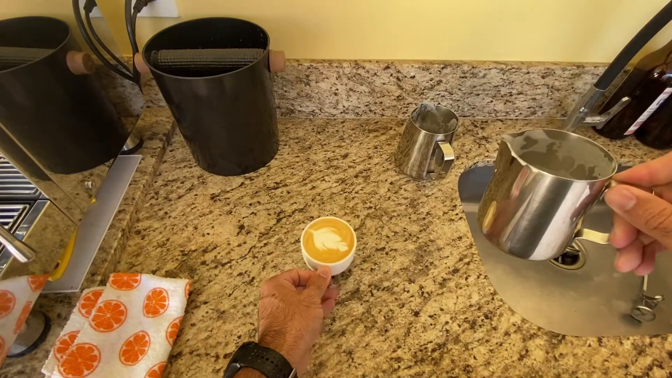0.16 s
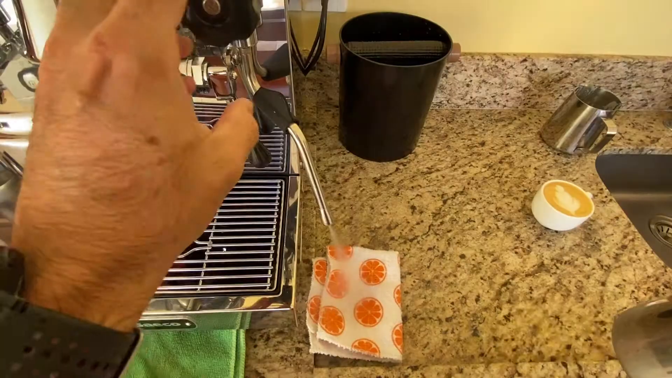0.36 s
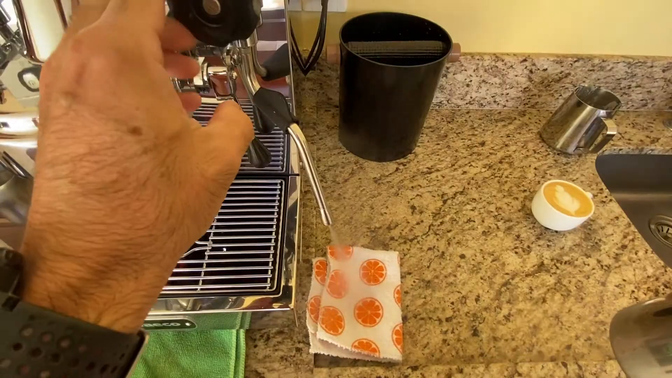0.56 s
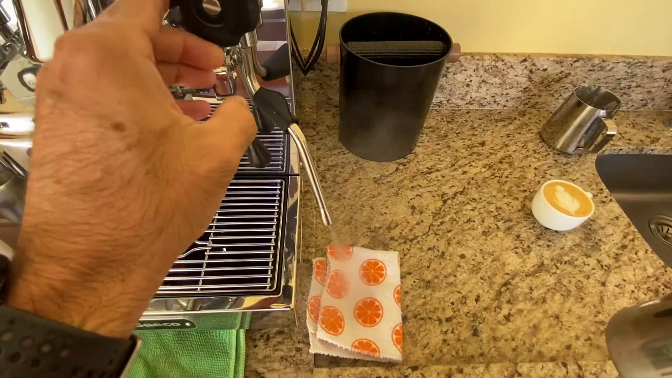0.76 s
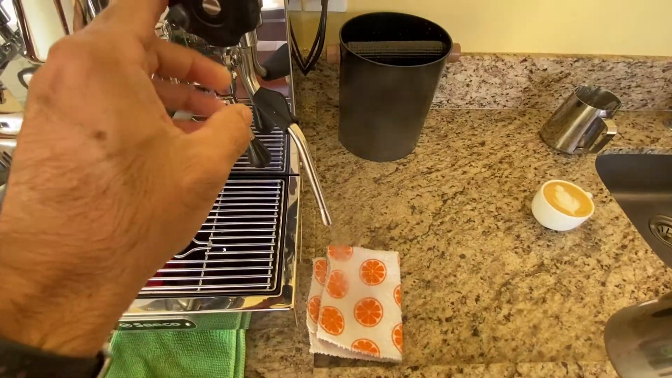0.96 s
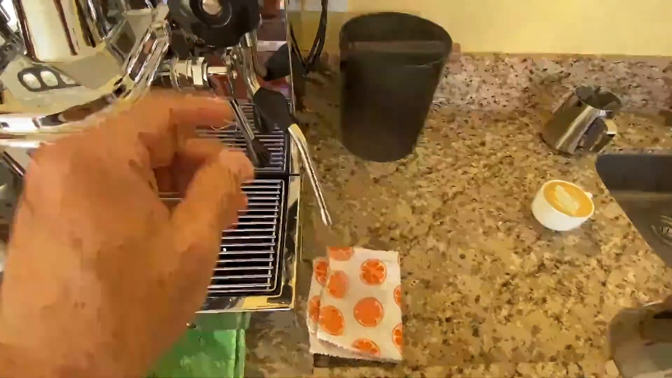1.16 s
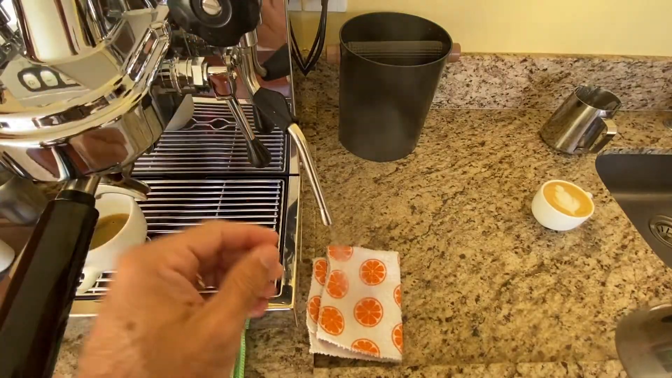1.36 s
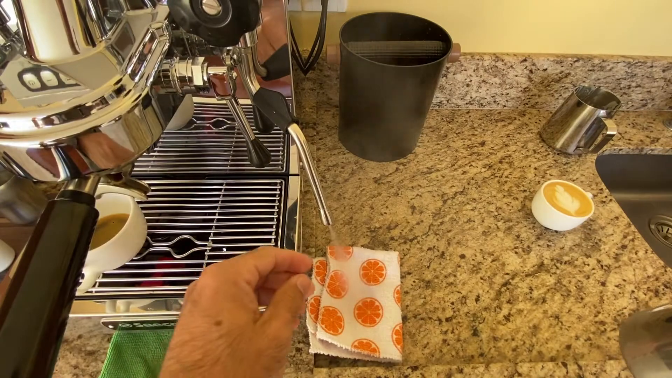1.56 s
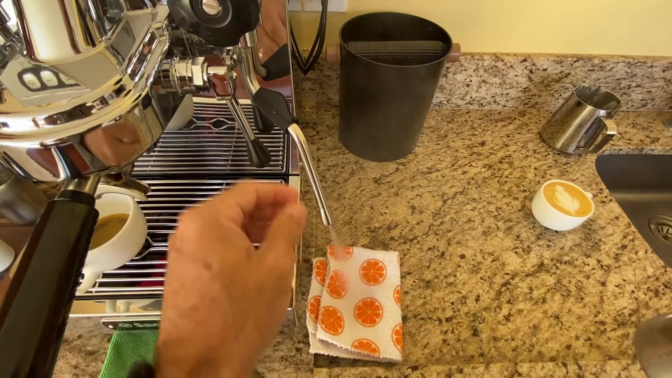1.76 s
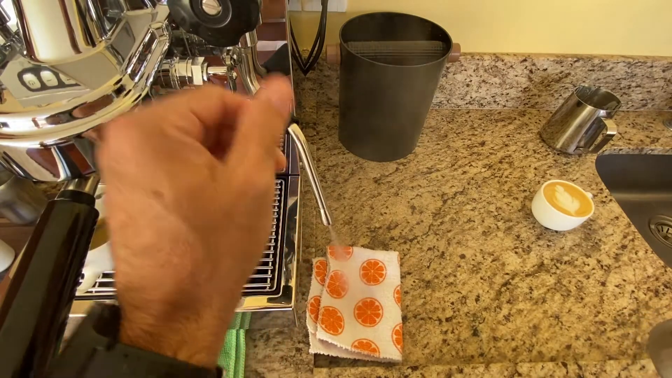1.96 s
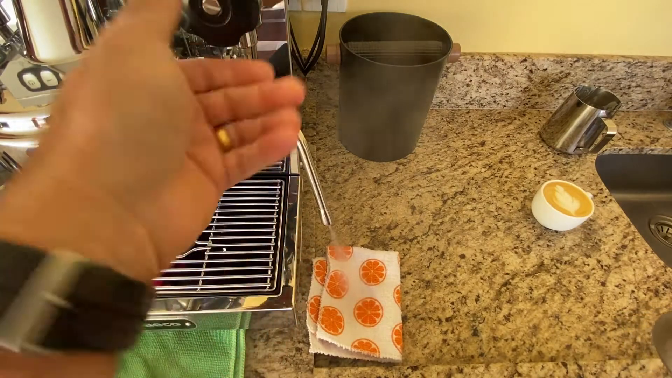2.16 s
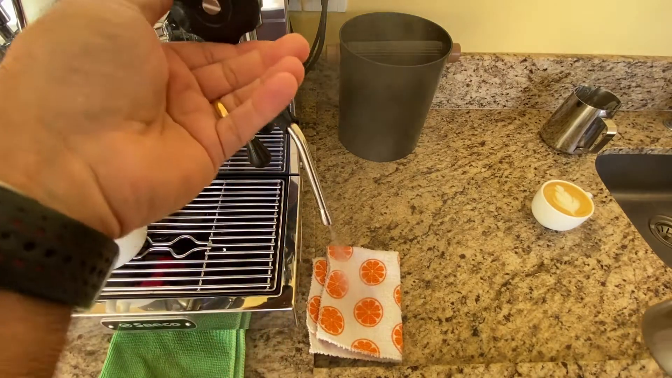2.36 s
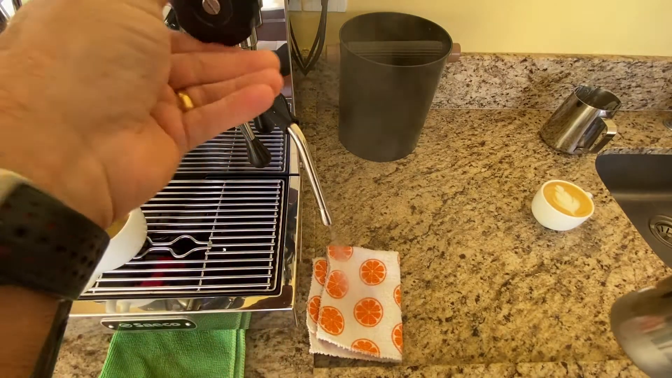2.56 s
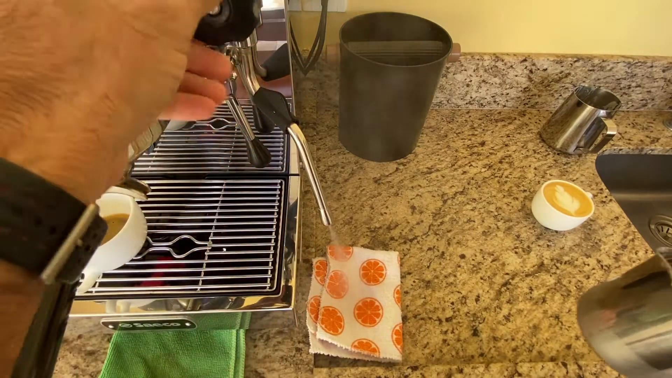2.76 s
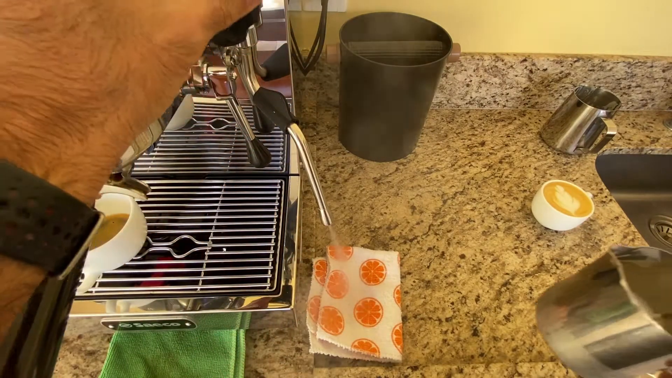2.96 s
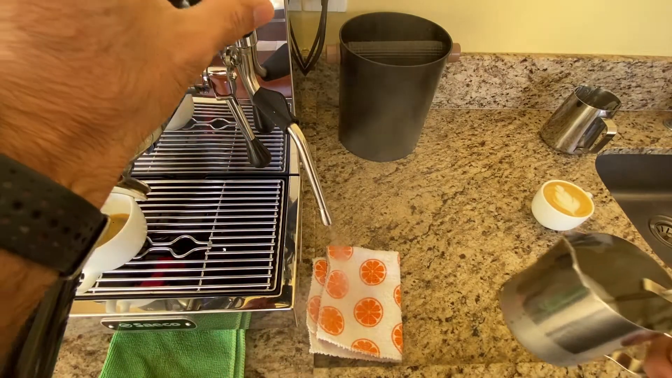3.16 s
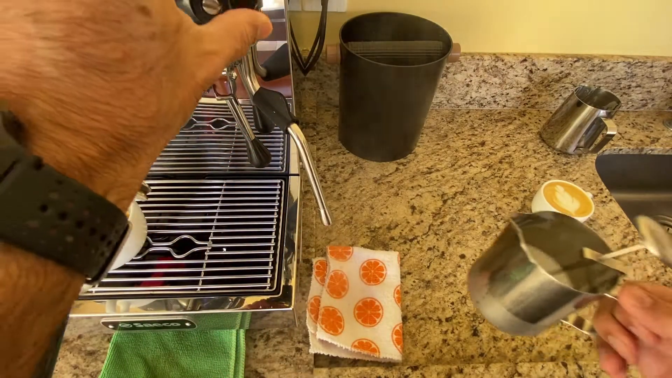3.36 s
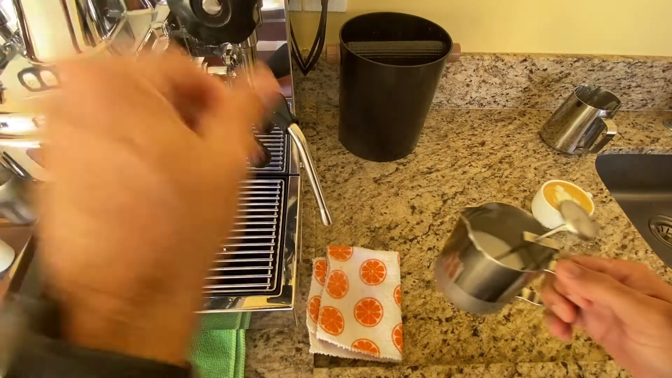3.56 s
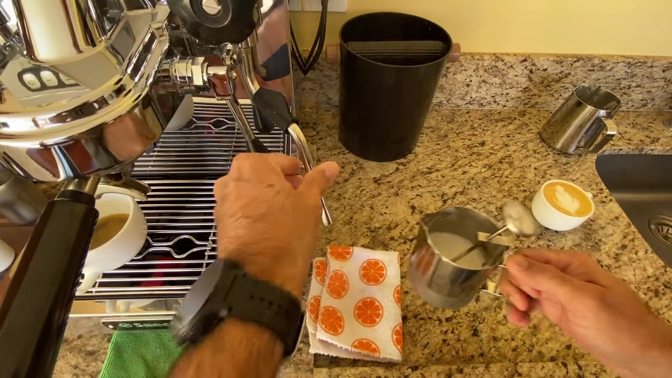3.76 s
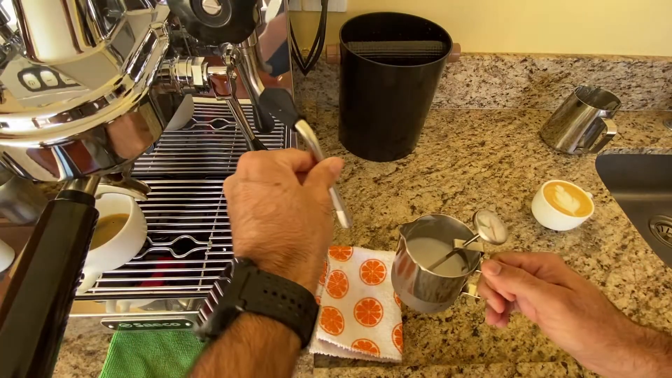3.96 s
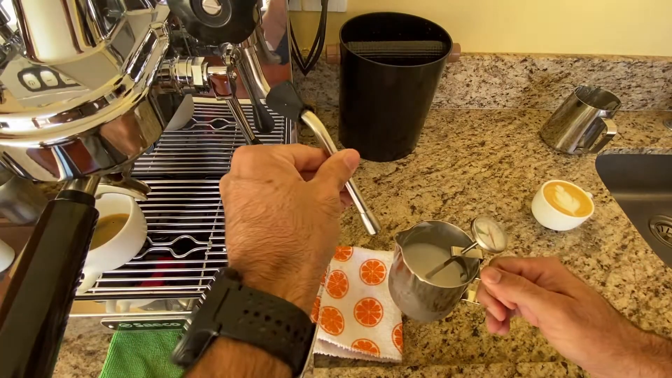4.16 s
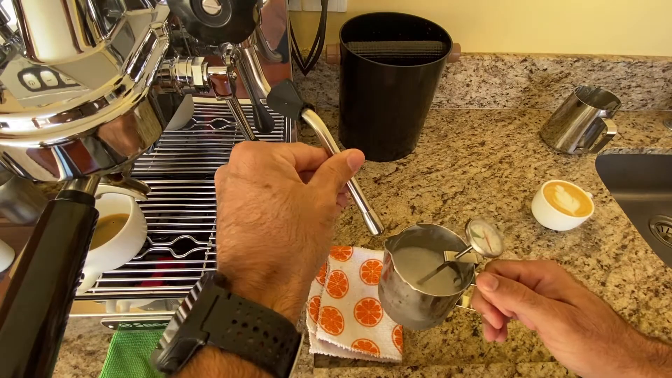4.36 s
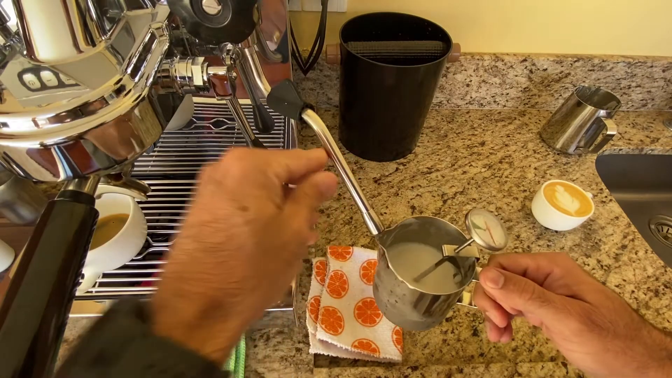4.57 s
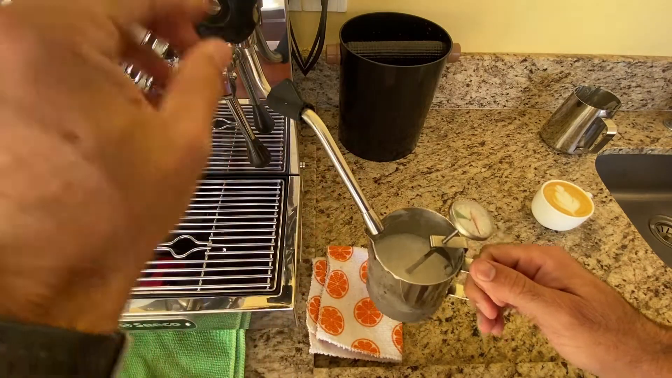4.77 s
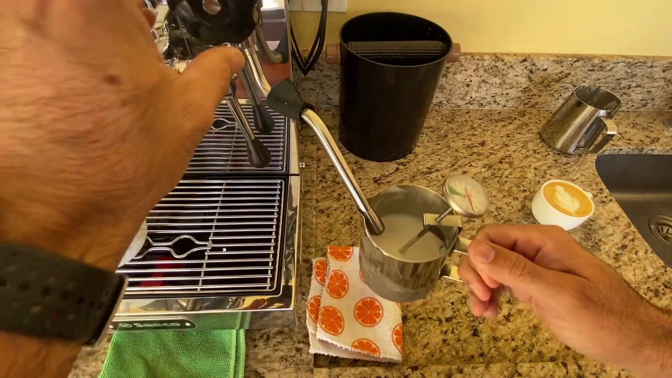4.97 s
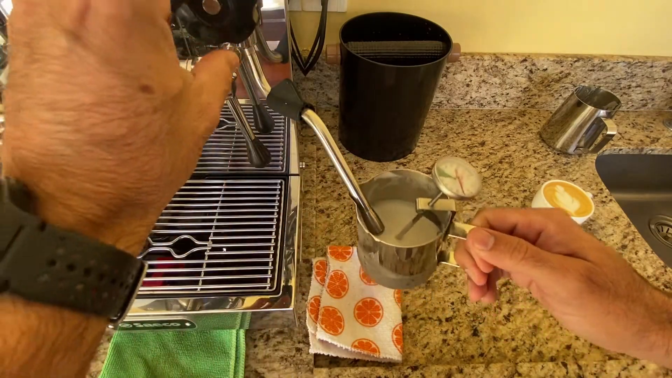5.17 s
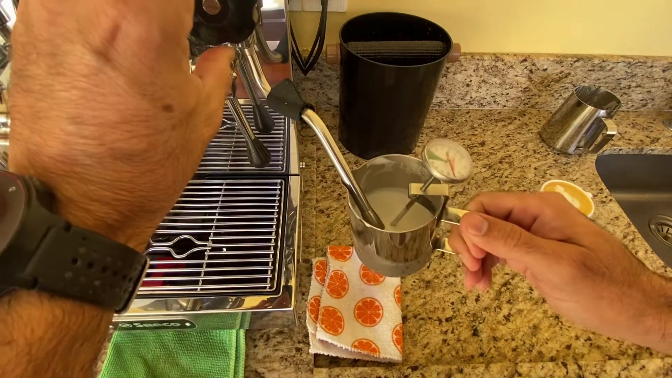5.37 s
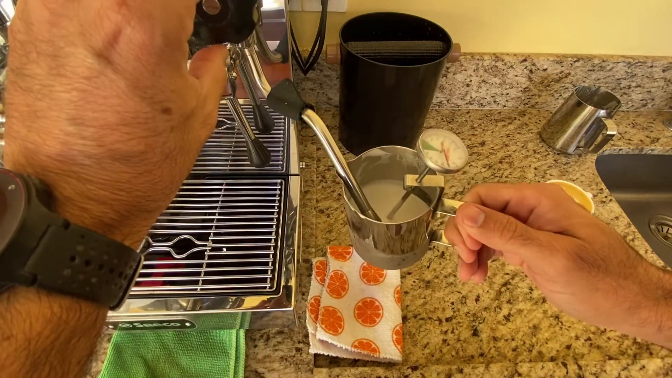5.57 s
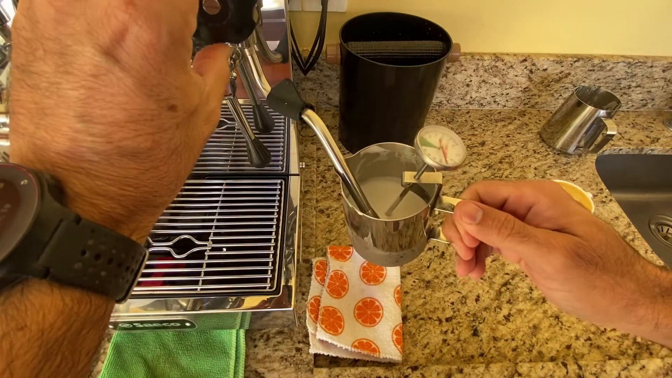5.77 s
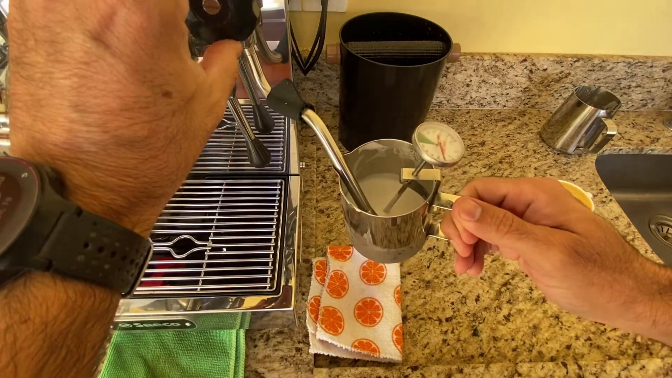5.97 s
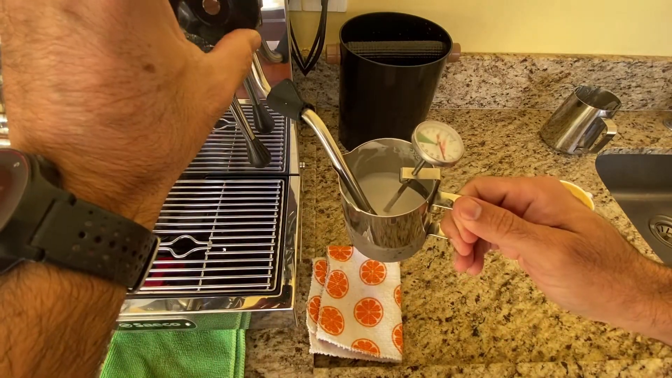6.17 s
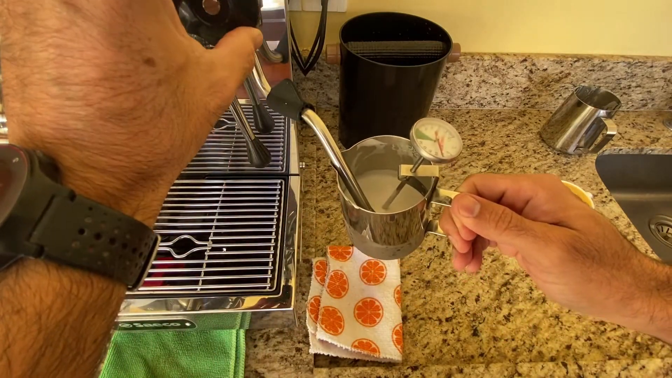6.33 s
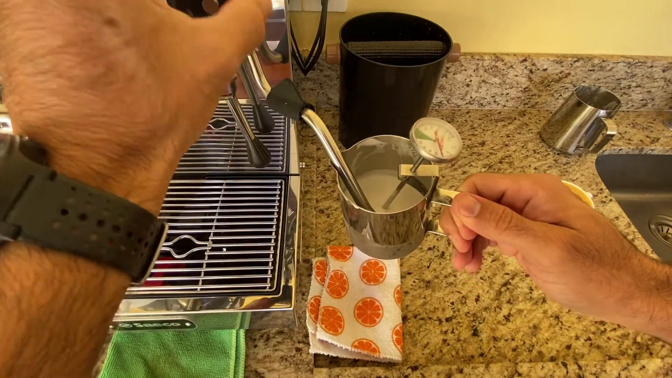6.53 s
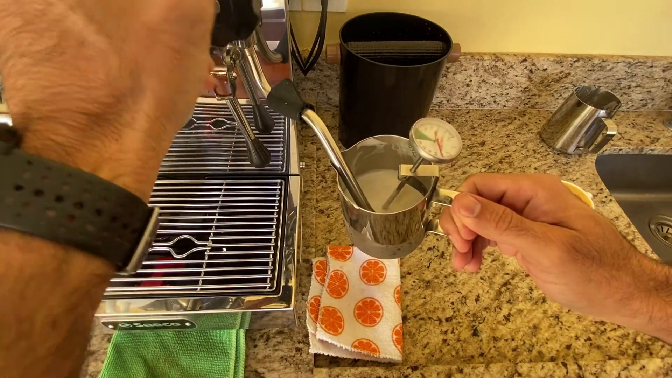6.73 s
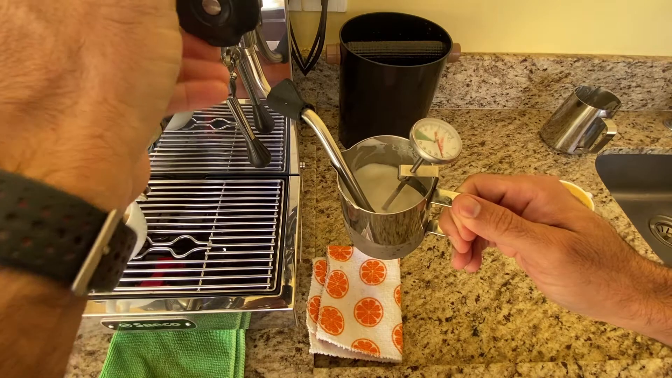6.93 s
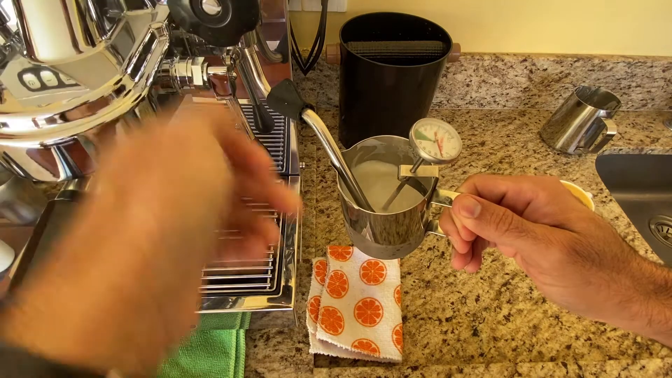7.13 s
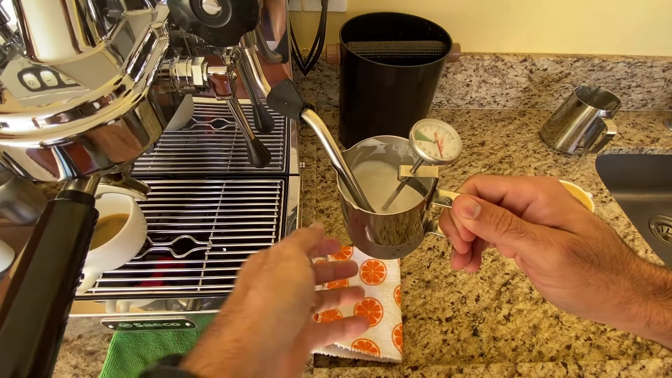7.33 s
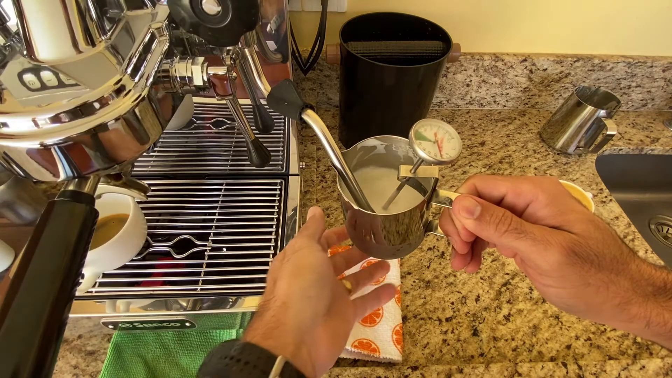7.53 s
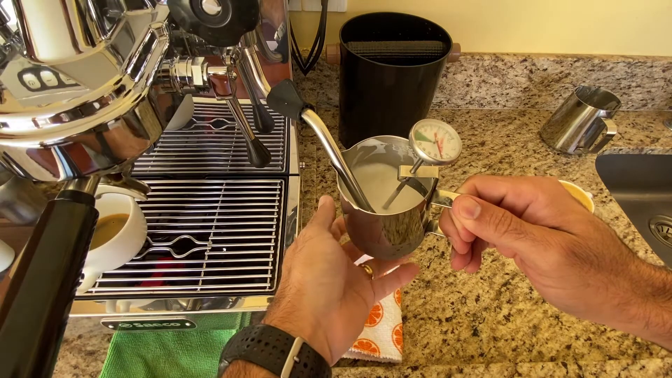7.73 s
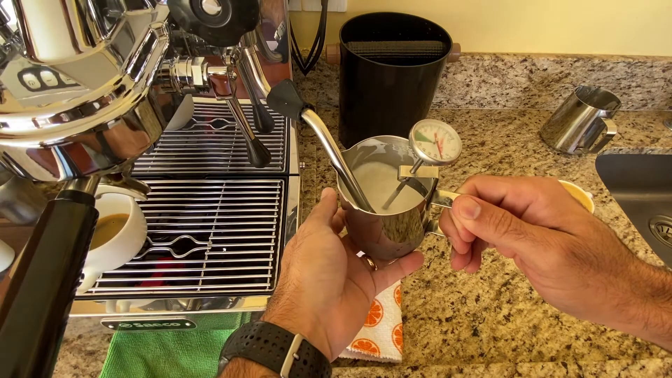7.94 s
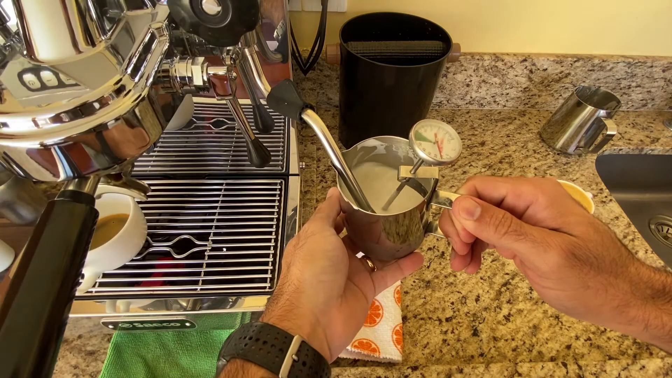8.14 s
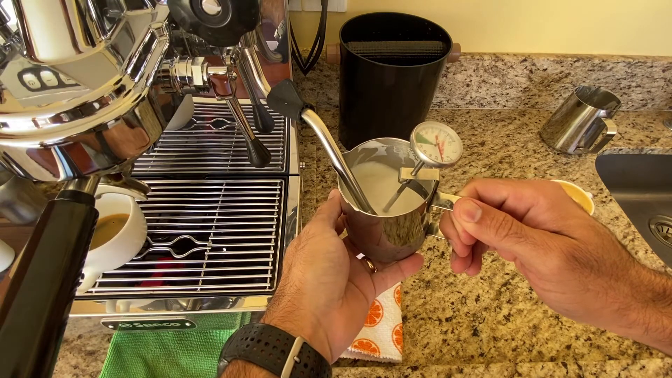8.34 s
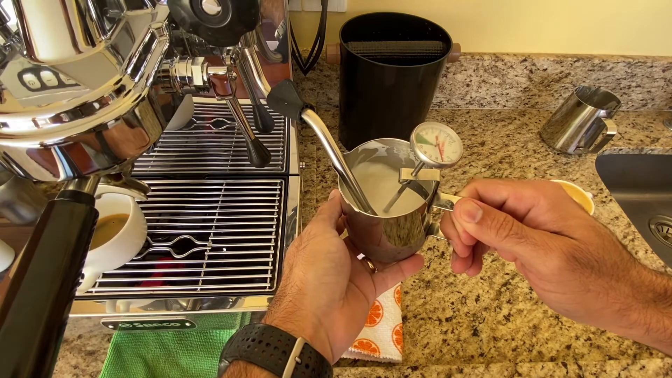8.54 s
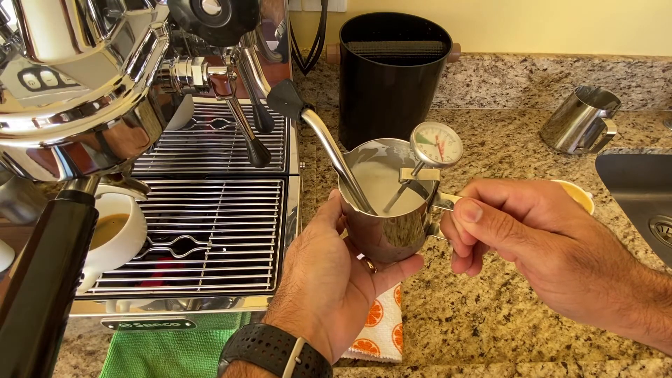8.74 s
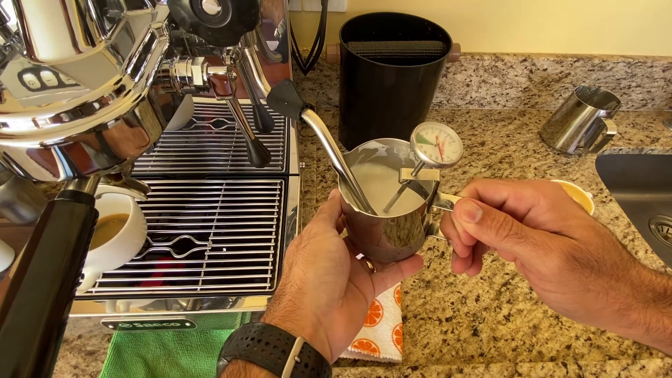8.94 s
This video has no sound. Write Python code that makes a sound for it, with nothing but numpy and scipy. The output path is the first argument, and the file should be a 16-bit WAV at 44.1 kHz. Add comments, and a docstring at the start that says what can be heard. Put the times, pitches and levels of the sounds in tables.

```python
"""A stone kitchen counter: an espresso machine's steam wand is purged into the air, then shut.
The jet is coloured noise; the dribbling nozzle sputters. The leaking tip is dipped into milk in a steel
pitcher, where sine bubbles plop and random pops gurgle. The valve opens again and steam tears air into
the milk: dense coloured pops make a crackling hiss over a low throb, mains hum and room tone."""
import sys
import numpy as np
from scipy import signal
from scipy.fft import rfft, irfft
from scipy.io import wavfile
from scipy.ndimage import map_coordinates

SR = 44100
rng = np.random.default_rng(int(sys.argv[2]) if len(sys.argv) > 2 else 0)


def output_pcm(signal):
    """Save a mono or channel-first signal as 16-bit PCM at the path in sys.argv[1].

    Samples are clipped to [-1, 1] before scaling.
    """
    pcm = np.clip(np.atleast_2d(signal).T, -1, 1) * 32767
    wavfile.write(sys.argv[1], SR, np.round(pcm).astype(np.int16))


N = 396900
TIME = np.arange(N) / SR
HZ = np.maximum(np.arange(N // 2 + 1) * SR / N, 1)
VALVE_OPENS_S = 0.4086
GURGLE_HZ = 1180  # usual pitch of the churning milk

# big bubbles: (start [s], level before swell and decay [dB], pitch [Hz], t60 [s])
BUBBLES = [(4.7198, -12, 1070, 0.026), (4.7523, -19, 1060, 0.023), (4.769, -25, 1010, 0.036),
           (4.973, -23, 1074, 0.038), (5.028, -28, 1080, 0.036), (6.757, -21, 1250, .03),
           (6.771, -22, 1150, .04), (6.953, -23, 1210, .03), (6.981, -21, 1230, 0.037),
           (7.152, -23, 1156, .035), (7.236, -24, 1170, .035), (7.266, -27, 930, .05),
           (7.412, -26, 1130, .04), (7.719, -30, 1250, .03), (8.375, -23, 1200, .04),
           (8.547, -22, 1160, .045), (8.573, -23, 1080, .03), (8.673, -20.5, 1250, .03),
           (8.866, -16, 1210, 0.044), (8.978, -23, 1250, .03)]
# spurts as the valve opens a crack, then fully: (time [s], level before flutter [dB], decay [s])
SPURTS = [(6.589, -37, 0.013), (6.634, -40, 0.018)]
# colour of hiss in the milk: (frequency [Hz], relative density [dB per Hz])
HISS_COLOUR = [(2500, -22), (3900, -12), (4400, -6.5), (4800, 3), (5700, -2.5), (6900, -5), (8200, 4),
               (9500, -13), (10500, 3), (12500, -16.5)]
# colour of ticks and fizz: (frequency [Hz], relative density [dB per Hz])
TICK_COLOUR = [(700, -21), (2000, -3), (4000, 0), (5500, 0.5), (7000, -5), (11000, -14.5), (16000, -20)]


def from_db(db):
    """Decibels to gain."""
    return np.exp(np.asarray(db) * (np.log(10) / 20))


def unit(x):
    """Scale so that the mean of the channels has rms 1."""
    return x / np.sqrt(np.mean(np.atleast_2d(x).mean(axis=0) ** 2) + 1e-20)


def over_hz(rows):
    """Interpolate the columns of a table on a log-frequency axis."""
    hz, *columns = np.transpose(rows)
    return [np.interp(np.log(HZ), np.log(hz), c) for c in columns]


def colour(rows):
    """Gain per frequency, falling steeply beyond both ends of the table."""
    below = 1 + (.7 * rows[0][0] / HZ) ** 8
    above = 1 + (.7 * HZ / rows[-1][0]) ** 8
    return from_db(over_hz(rows)[0]) / np.sqrt(below * above)


def lifts(rows):
    """Gain per frequency of a set of resonances and hollows."""
    return from_db(sum(db / (1 + (2 * (HZ - hz) / width) ** 2) for hz, width, db in rows))


def nearby(echo_db, decay_s):
    """Dense early echoes off counter, wall and machine comb the spectrum."""
    age = TIME[:SR // 10]
    echoes = rng.standard_normal(len(age)) * (age > .002) * np.exp(-age / decay_s)
    return 1 + from_db(echo_db) * rfft(echoes / np.linalg.norm(echoes), N)


def drift(rate_hz):
    """Low-passed noise of rms 1, drawn at every tenth sample."""
    white = rfft(rng.standard_normal(N // 10))
    slow = irfft(white / (1 + (HZ[:len(white)] / rate_hz) ** 2))
    return np.interp(np.arange(N) / 10, np.arange(len(slow)), unit(slow))


def noise():
    """Three white noises: the direct sound and what the kitchen returns to each channel."""
    return rng.standard_normal((3, N), dtype=np.float32)


def pops(per_s, spread_db, smear_s, scatter):
    """Random collapses of uneven size, each trailed by a short noisy scatter."""
    size, born = rng.standard_exponential(N), rng.random(N) < per_s / SR
    sign = rng.choice([-1, 1], N)
    clicks = np.zeros(N)
    clicks[born] = from_db(spread_db * np.minimum(size[born], 4)) * sign[born]
    smear_pole = np.exp(-1 / (smear_s * SR))
    power = signal.lfilter([1], [1, -smear_pole], clicks ** 2 + 1e-18)
    out = unit(np.sqrt(power)) * noise()
    out[0] = unit(unit(clicks) + scatter * out[0])
    return out


def opens(start_s, rise_s):
    """Flow that sets in at a moment."""
    return 1 - np.exp(-np.maximum(TIME - start_s, 0) / rise_s)


def held(start_s, end_s, attack_s, release_s):
    """Flow that sets in, holds and dies away."""
    return opens(start_s, attack_s) * np.exp(-np.maximum(TIME - end_s, 0) / release_s)


def swell(centre_s, half_length_s):
    """A rounded rise and fall about a moment."""
    return 1 / (1 + np.square(((TIME - centre_s) / half_length_s) ** 2))


def bursts(rows):
    """Envelope of sudden bursts that die away."""
    out, age = np.zeros(N + SR), TIME[:SR // 2]
    for start_s, db, decay_s in rows:
        out[int(start_s * SR):][:len(age)] += from_db(db) * np.exp(-age / decay_s)
    return out[:N]


def waver(sound, shift):
    """Move all pitches up and down by a changing share, by reading the sound at a varying speed."""
    place = np.arange(N) + np.cumsum(shift)
    return np.array([map_coordinates(side, [place], order=3, mode="wrap") for side in sound])


def stereo_gains():
    """Gains of the direct sound (shared, phase-shifted) and of the independent sound in each channel."""
    # (frequency [Hz], left lead [rad], likeness [0-1], left minus right [dB])
    stereo_image = [(100, 0.98, 0.98, -2), (373, 0.55, 0.94, -3), (723, 2.5, 0.3, 5.5),
                    (1210, 0.1, 0.89, -3), (1880, 1.5, 0.7, -2), (2870, 1.5, 0.4, 0.5), (5030, 1.4, .62, 1),
                    (6700, 0.66, .5, 0), (8040, 2.5, 0.5, -3), (9600, 3, 0.1, -9), (10750, 1, .8, -.5),
                    (12250, -2, .8, -2), (13400, -2, 1, 0), (15280, -6, 1, 0)]
    lead_rad, likeness, balance_db = over_hz(stereo_image)
    likeness = np.clip(likeness, 0, 1)
    sides = np.array([[1], [-1]])
    balance = from_db(.5 * balance_db * sides)
    direct = np.sqrt(likeness) * np.exp(.5j * lead_rad * sides) * balance
    diffuse = np.sqrt(1 - likeness) * balance
    return direct.astype(np.complex64), diffuse.astype(np.float32)


DIRECT, DIFFUSE = stereo_gains()


def heard(sound, gain):
    """Colour a source and bring it to the two channels; rms 1."""
    spectrum = rfft(sound.astype(np.float32)) * gain.astype(np.complex64)
    return unit(irfft(DIRECT * spectrum[0] + DIFFUSE * spectrum[1:], N))


def kitchen(mains_hz=59.7, hum_settles_s=.12, room_db=-64.5, clatter_db=-43.5, clatter_decay_s=0.067,
            lingering_db=-56.5, lingering_decay_s=0.49):
    """Two mains harmonics, louder until the valve first opens, room noise and a clatter's two-stage decay."""
    # fundamental, then octave: (early level [dB], later level [dB]), before channel balance
    hum_levels = [(-52.5, -60.5), (-49, -61)]
    # (frequency [Hz], relative density [dB per Hz])
    room_colour = [(42, -2), (65, 0.5), (100, 3), (170, -2.5), (300, -8.5), (500, -14), (900, -23.5),
                   (1500, -37.5), (2300, -32), (3400, -28), (4700, -30), (6000, -38.5), (9000, -41),
                   (15000, -51)]
    # (frequency [Hz], relative density [dB per Hz])
    clatter_colour = [(100, -7), (200, -10.5), (400, -5.5), (700, -17.5), (1200, -20), (2500, -27.5),
                      (4000, -39.5), (8000, -59)]
    early = np.exp(-np.maximum(TIME - VALVE_OPENS_S, 0) / hum_settles_s)
    phase = 2 * np.pi * mains_hz * TIME
    hum = np.zeros(N)
    for harmonic, (early_db, later_db) in enumerate(hum_levels, 1):
        hum += from_db(later_db + (early_db - later_db) * early) * np.sin(harmonic * phase)
    hum = np.sqrt(2) * hum * from_db([[-1.3], [1.2]])  # left, right
    room = from_db(room_db) * heard(noise(), colour(room_colour))
    clatter = from_db(clatter_db) * np.exp(-TIME / clatter_decay_s)
    clatter += from_db(lingering_db) * np.exp(-TIME / lingering_decay_s)
    return hum + room + clatter * heard(noise(), colour(clatter_colour))


def purge(hiss_trim_db=0.77, roar_trim_db=0.5, hiss_flutter_db=1.0, roar_flutter_db=1.0, split_hz=3000):
    """Wet steam leaves the nozzle: a bright hiss with narrow resonances over a turbulent roar."""
    # open jet: (time [s], hiss level before trim [dB], roar level before trim [dB])
    jet_levels = [(0.42, -30, -43), (0.48, -25, -36), (0.55, -22.5, -33), (1.04, -24, -39),
                  (1.08, -28, -41.5), (1.38, -30, -46), (1.53, -31, -41.5), (1.67, -26.5, -37.5),
                  (1.74, -29.5, -41), (1.9, -26, -37), (2.64, -28, -41), (2.77, -31.5, -46),
                  (2.8, -28, -39), (2.93, -26.5, -39), (3.08, -30, -41.5), (3.26, -27, -37.5)]
    # (frequency [Hz], relative density [dB per Hz])
    jet_colour = [(130, -15.5), (230, -7), (420, -10), (800, -10.5), (1400, -7), (2600, -11.5),
                  (3800, -8.5), (4600, -4.5), (7000, -4), (9500, -1), (12000, -5.5), (14100, -5.5),
                  (15000, -0.5), (15600, -7.5)]
    # nozzle and nook between machine and wall: (frequency [Hz], width [Hz], lift [dB])
    nozzle_resonances = [(417, 70, 6.5), (690, 80, -4.5), (890, 86, 4), (1135, 55, -4.5), (1720, 32, -3.5),
                         (1880, 55, -4.5), (2079, 44, 6), (2530, 35, 4.5), (3190, 110, 3), (3410, 170, 7),
                         (3817, 180, -6), (4240, 230, 5), (4887, 130, -3.5), (5290, 55, 3.5),
                         (5480, 120, 3), (5861, 50, -6.5), (6220, 41, 3), (6400, 130, 6.5), (6640, 50, 4),
                         (6752, 130, 5.5), (7700, 110, -2), (8000, 61, 7), (8142, 40, 5.5),
                         (10500, 100, 3.5), (11240, 180, 4.5), (11530, 150, 5), (12470, 350, 7)]
    shuts_s, hiss_fall_db_per_s, roar_fall_db_per_s = 3.256, 108, 95
    # the shut valve still seeps, fading until the tip meets the milk; levels before trim
    seep_db, seep_fall_db_per_s = -69, 3.5
    seep_roar_db, seep_roar_fall_db_per_s = -4, 9  # relative to the seeping hiss
    times_s, hiss_curve_db, roar_curve_db = np.transpose(jet_levels)
    since_shut_s = np.maximum(TIME - shuts_s, 0)
    seep = from_db(seep_db - seep_fall_db_per_s * since_shut_s)
    seep = seep * held(shuts_s, BUBBLES[0][0], attack_s=.05, release_s=.03)
    seep_roar = seep * from_db(seep_roar_db - seep_roar_fall_db_per_s * since_shut_s)
    hiss = from_db(np.interp(TIME, times_s, hiss_curve_db) - hiss_fall_db_per_s * since_shut_s) + seep
    roar = from_db(np.interp(TIME, times_s, roar_curve_db) - roar_fall_db_per_s * since_shut_s) + seep_roar
    gain = colour(jet_colour) * lifts(nozzle_resonances) * nearby(echo_db=-10, decay_s=.016)
    low = 1 / (1 + (HZ / split_hz) ** 8)
    hiss = hiss * from_db(hiss_trim_db + hiss_flutter_db * drift(60))
    hiss = hiss * heard(noise(), gain * np.sqrt(1 - low))
    roar = roar * from_db(roar_trim_db + roar_flutter_db * drift(40))
    roar = roar * heard(noise(), gain * np.sqrt(low))
    return opens(VALVE_OPENS_S, rise_s=0.0042) * (hiss + roar)


def dribble(flutter_db=2.0):
    """The last wet steam sputters as random drops from the shut nozzle."""
    # (start [s], end [s], attack [s], release [s], level before flutter [dB])
    *shape, db = (3.42, 3.77, .05, .06, -66.5)
    # (frequency [Hz], relative density [dB per Hz])
    drop_colour = [(850, 1.2), (1900, -1), (2350, 2), (4500, -1.2)]
    drops = pops(per_s=500, spread_db=2.5, smear_s=0.0057, scatter=1.0)
    return from_db(db + flutter_db * drift(25)) * held(*shape) * heard(drops, colour(drop_colour))


def ticks_and_knocks():
    """Bubble collapses, valve ticks and dull knocks: decaying bursts of coloured noise."""
    # (time [s], level [dB], decay [s])
    tick_times = [(4.046, -70, .006), (4.63, -64, .023), (4.7192, -36.5, 0.0075), (4.752, -49, .005),
                  (4.972, -45.5, 0.0068), (5.005, -53, 0.019), (5.102, -54.5, .006), (6.522, -59.5, 0.028),
                  (6.587, -47.5, 0.021)]
    # (time [s], level [dB], decay [s])
    knock_times = [(4.04, -55, 0.032), (4.722, -40, 0.035), (4.745, -44.5, 0.025), (4.772, -40.5, 0.015),
                   (6.592, -45, 0.02)]
    # (frequency [Hz], relative density [dB per Hz])
    knock_colour = [(40, -8.5), (100, -10), (170, -7.5), (270, -1.5), (450, -14), (800, -18), (2000, -29.5),
                    (5000, -39)]
    ticks = bursts(tick_times) * heard(noise(), colour(TICK_COLOUR))
    return ticks + bursts(knock_times) * heard(noise(), colour(knock_colour))


def whooshes(hold_s=.055):
    """Soft bands of hiss from wand and valve swell, hold, slide and tail off."""
    # (start [s], rise [s], decay [s], from [Hz], to [Hz], width [Hz], level [dB])
    bands = [(4.22, .05, .06, 5000, 3600, 500, -75), (5.492, .025, 0.046, 5300, 4400, 420, -71),
             (5.49, .02, .06, 5280, 5180, 110, -73), (5.765, .06, 0.11, 3350, 3800, 370, -71)]
    out, age = np.zeros(N), TIME[:SR]
    for start_s, rise_s, decay_s, from_hz, to_hz, width_hz, db in bands:
        hz = to_hz + (from_hz - to_hz) * np.exp(-age / (rise_s + decay_s))
        tail = np.exp(-np.maximum(age - rise_s - hold_s, 0) / decay_s)
        shape = np.minimum(age / rise_s, 1) * tail
        tone = np.sqrt(2) * np.sin(2 * np.pi * np.cumsum(hz) / SR)
        out[int(start_s * SR):][:SR] += from_db(db) * shape * tone * drift(width_hz)[:SR]
    return out


def dip(gurgle_trim_db=-2.5, flutter_db=1.0):
    """Leaking steam bubbles through the milk and rings the air in the pitcher."""
    # seeping tip: (start [s], end [s], attack [s], release [s], gurgle before trim [dB], fizz [dB])
    *shape, leak_gurgle_db, leak_fizz_db = (4.39, 5.53, .1, .06, -61, -80.5)
    # trapped steam escapes: (time [s], half length [s], gurgle before trim [dB], fizz [dB])
    gushes = [(4.763, 0.026, -40, -62), (4.82, 0.018, -50, -71), (4.874, .028, -48, -65.5),
              (4.95, 0.046, -55, -61.5), (5.033, 0.03, -45.5, -62.5), (5.11, .04, -56, -73)]
    # pitcher: (frequency [Hz], width [Hz], relative level [dB])
    cavity_resonances = [(1030, 264, -1), (1232, 72, -8.5), (1540, 27, -13.5), (1780, 90, -20)]
    # wand: (frequency [Hz], width [Hz], lift [dB])
    wand_resonances = [(3330, 200, 8), (3720, 160, 4.5), (4100, 250, -4.5), (4900, 200, 8), (5400, 300, -6),
                       (5800, 200, 3), (6500, 500, -4), (7400, 300, 6), (8500, 250, 6)]
    leak = from_db([[leak_gurgle_db], [leak_fizz_db]]) * held(*shape)
    gush = sum(from_db([[gurgle_db], [fizz_db]]) * swell(s, half_s)
               for s, half_s, gurgle_db, fizz_db in gushes)
    gurgle, fizz = leak + gush
    cavity = sum(from_db(db) / (1 + (2 * (HZ - hz) / width) ** 2) for hz, width, db in cavity_resonances)
    grains = pops(per_s=800, spread_db=1.5, smear_s=0.0036, scatter=1.0) * from_db(flutter_db * drift(30))
    fizz_gain = colour(TICK_COLOUR) * lifts(wand_resonances) + colour(HISS_COLOUR) / 3
    return from_db(gurgle_trim_db) * gurgle * heard(grains, cavity) + fizz * heard(grains, fizz_gain)


def plops(swell_s=0.00122, room_db=-16, room_decay_s=0.0439):
    """Big bubbles ring as short sines; the kitchen answers with a decaying noise tail."""
    out = np.zeros(N + SR)
    for start_s, db, hz, t60_s in BUBBLES:
        age = np.arange(int(t60_s * SR)) / SR
        tone = np.sin(2 * np.pi * hz * age) * (1 - np.exp(-age / swell_s))
        out[int(start_s * SR):][:len(age)] += from_db(db) * tone * np.exp(-np.log(1000) * age / t60_s)
    age = TIME[:SR // 2]
    tail = rng.standard_normal((2, len(age))) * np.exp(-age / room_decay_s)
    tail = tail * np.sqrt(2 / (room_decay_s * SR))  # unit energy
    return out[:N] + from_db(room_db) * signal.oaconvolve(out[None], tail)[:, :N]


def squeaks(roughness=.72):
    """Thin squeaks and whines of wand and valve: tones that slide, roughened by noise (0 clear, 1 hissy)."""
    # (start [s], length [s], from [Hz], to [Hz], width [Hz], level before roughening [dB])
    slides = [(4.836, .075, 1190, 1326, 25, -48.5), (4.883, 0.042, 1530, 1590, 45, -54),
              (4.906, 0.07, 1750, 2750, 130, -65), (4.982, 0.06, 1830, 1980, 130, -51),
              (4.975, .1, 1570, 1550, 30, -60), (5.029, .04, 1190, 1313, 35, -50),
              (5.892, .08, 1100, 1100, 140, -78)]
    clear = np.sqrt(1 - roughness ** 2)
    out = np.zeros(N)
    for start_s, length_s, from_hz, to_hz, width_hz, db in slides:
        along = np.linspace(0, 1, int(length_s * SR))
        hz = from_hz + (to_hz - from_hz) * along
        tone = np.sqrt(2) * np.sin(2 * np.pi * np.cumsum(hz) / SR)
        grip = clear + roughness * (clear + roughness * drift(width_hz)[:len(along)])
        out[int(start_s * SR):][:len(along)] += from_db(db) * np.sin(np.pi * along) * tone * grip
    return out


def gulps(ring_db=-6, width_hz=55, glug_length_share=0.81):
    """The tip tears in extra air and the pocket collapses with a glug: air, gurgle, pitch pull, ringing."""
    # (time [s], half length [s], crackle before trim [dB], gurgle before trim [dB], pitch [Hz])
    gulp_rows = [(6.72, 0.036, -25.5, -40, 1150), (6.785, 0.036, -28.5, -34.5, 1190),
                 (6.984, .035, -34, -33.5, 1220), (7.125, .05, -42, -38, 1150),
                 (7.257, 0.033, -29.5, -37, 1080), (7.394, 0.04, -36, -43, 1060),
                 (7.475, .03, -33, -50, 1200), (7.71, .022, -36, -51, 1251),
                 (7.986, 0.0081, -36.5, -46, 1199), (8.22, 0.019, -31, -54, 1200),
                 (8.306, 0.021, -25.5, -40, 1200), (8.372, .025, -27.5, -39.5, 1182),
                 (8.467, .02, -31, -43, 1206), (8.58, .028, -26, -37.5, 1170),
                 (8.672, 0.028, -27.5, -35, 1250), (8.78, 0.036, -26, -36.5, 1110),
                 (8.849, 0.025, -24, -34.5, 1180), (8.985, .03, -29.5, -37, 1220)]
    air_power, gurgle_power, pull, tones = np.zeros((4, N))
    for centre_s, half_s, crackle_db, gurgle_db, hz in gulp_rows:
        gulp = swell(centre_s, half_s)
        glug = from_db(gurgle_db) * swell(centre_s, half_s * glug_length_share)
        air_power += (from_db(crackle_db) * gulp) ** 2
        gurgle_power += glug ** 2
        pull += gulp * (hz / GURGLE_HZ - 1)
        tones += glug * np.sin(2 * np.pi * hz * TIME)
    ringing = from_db(ring_db) * np.sqrt(2) * tones * drift(width_hz)
    return np.sqrt(air_power), np.sqrt(gurgle_power), pull, ringing


def stray_bubbles(per_s=90, spread_octaves=0.2, t60_s=0.028, rise_per_s=6.0, spread_db=3.5):
    """Single bubbles among the foam, each with its own pitch, rising as it rings; rms 1."""
    age, out = TIME[:SR // 16], np.zeros(N + SR)
    for when, octave, size in rng.standard_normal((int(per_s * N / SR), 3)):
        hz = GURGLE_HZ * 2 ** (spread_octaves * np.clip(octave, -2, 2))
        tone = np.sin(2 * np.pi * hz * (age + rise_per_s * age ** 2 / 2)) * (1 - np.exp(-age * hz / 2))
        start = int(when * N) % N
        ringing = tone * np.exp(-np.log(1000) * age / t60_s)
        out[start:start + len(age)] += from_db(spread_db * min(size, 2)) * ringing
    return unit(out[:N])


def frothing():
    """Steam collapses in the milk: dense pops ring the pitcher while air is torn in at the tip."""
    # tip at the surface draws air: (start [s], end [s], crackle before trim [dB])
    at_surface = [(6.65, 7.566, -38.5), (7.313, 7.548, -41), (8.06, 8.2, -44), (8.19, 9, -35),
                  (8.445, 9, -40.5)]
    # steam churns the milk: (time [s], gurgle before trim [dB])
    churn = [(6.63, -41), (6.9, -44), (7.35, -42), (7.62, -52), (8.0, -46.5), (8.24, -46.5), (8.32, -40.5),
             (9, -37.5)]
    # milk thrown up, then settling: (start [s], end [s], attack [s], release [s], splash [dB])
    *rush_shape, rush_splash_db = (6.72, 7, .04, .29, -41.5)
    # dry steam before the milk closes round the tip: (time [s], level before flutter [dB], decay [s])
    puff = (6.632, -28, 0.049)
    # squeal as the valve opens: (time [s], level [dB], length [s])
    squeal_s, squeal_db, squeal_length_s = (6.647, -30.5, 0.012)
    # shallow tip, slopping milk: (start [s], end [s], attack [s], release [s], level at usual churn [dB])
    *slop_shape, slop_db = (6.7, 7.45, .03, .05, -42.5)
    # tip breaks the surface and spits: (time [s], level before flutter [dB], decay [s])
    spits = [(7.668, -31, 0.04), (7.862, -33.5, .022), (7.941, -33, .012), (7.979, -33, 0.015),
             (8.024, -28.5, 0.0092), (8.197, -25.5, 0.014), (8.232, -26, .005), (8.2693, -18, 0.005),
             (8.284, -22, .005), (8.344, -28, .012), (8.375, -21, .006), (8.44, -30, .012),
             (8.541, -28, .012), (8.626, -25, .01), (8.816, -27, .012), (8.938, -28, .012)]
    # layer colours, each: (frequency [Hz], relative density [dB per Hz])
    gurgle_colour = [(500, -20.5), (680, -13), (790, -7), (980, -9), (1170, 8.5), (1330, -2.5),
                     (1560, -8.5), (1850, -21), (2400, -42)]
    slop_colour = [(740, -15.5), (900, 2), (1200, -0.5), (1380, 3.5), (1950, -10)]
    splash_colour = [(350, -4), (600, -29), (900, -7), (1500, 6.5), (1720, 9.5), (1880, 5.5), (2050, 10.5),
                     (2600, 4), (3100, 6), (4000, -5.5)]
    ring_colour = [(2300, -18), (2800, -6), (3020, 5.5), (3160, 8.5), (3380, -7), (3620, -3.5),
                   (3900, -12.5)]
    crackle_colour = [(4000, -49), (8000, -14.5), (10100, -12), (10700, 4), (11200, -1), (12300, -6),
                      (13500, -17), (14200, 0), (14900, 2), (15700, -1)]
    # resonances and hollows of the pitcher: (frequency [Hz], width [Hz], lift [dB])
    pitcher_wall = [(3580, 100, 5), (4750, 150, 2.5), (5270, 170, -6), (12230, 150, 8)]
    gurgle_trim_db, crackle_trim_db, stray_db = -1.4, 3.5, -8
    usual_churn_db, usual_air_db = -39.5, -29
    splash_db, ring_db, hiss_db = -52.5, -49.5, -41.0  # at usual churn or air
    sunk_hiss_db, rush_hiss_db = -53, -48.5  # tip deep; extra while the milk is thrown up
    # shares of the gurgle's or air's swing
    splash_follows, ring_follows, slop_follows, hiss_follows = 0.81, 0.37, 0.73, 0.44

    gulped_air, glugs, pull, glug_tones = gulps()
    surface_air = sum(from_db(db) * held(start_s, end_s, attack_s=.01, release_s=.01)
                      for start_s, end_s, db in at_surface)
    air = np.hypot(gulped_air, surface_air)
    gurgle = np.hypot(glugs, from_db(np.interp(TIME, *np.transpose(churn))))
    vigour = gurgle / from_db(usual_churn_db)
    rush = held(*rush_shape)
    splash = from_db(splash_db) * vigour ** splash_follows + from_db(rush_splash_db) * rush
    ring = from_db(ring_db + 3.0 * drift(20)) * vigour ** ring_follows
    ring += from_db(squeal_db) * np.exp(-((TIME - squeal_s) / squeal_length_s) ** 2)
    air_hiss = from_db(hiss_db) * (air / from_db(usual_air_db)) ** hiss_follows
    hiss = np.hypot(from_db(sunk_hiss_db), air_hiss) + bursts([puff]) + from_db(rush_hiss_db) * rush
    walls = nearby(echo_db=-7, decay_s=.008)

    collapses = pops(per_s=990, spread_db=1, smear_s=0.0048, scatter=0.6) * from_db(2.2 * drift(41))
    tearing = pops(per_s=1900, spread_db=1.0, smear_s=0.0013, scatter=0.68) * from_db(2.0 * drift(39))
    fine = pops(per_s=4600, spread_db=4, smear_s=0.00087, scatter=1.24)
    slopping = pops(per_s=320, spread_db=2, smear_s=.003, scatter=.4)

    churning = waver(heard(collapses, colour(gurgle_colour)), .7 * pull + .024 * drift(21.99))
    flow = gurgle * (from_db(gurgle_trim_db) * churning + from_db(stray_db) * stray_bubbles()) + glug_tones
    slop = from_db(slop_db) * held(*slop_shape) * vigour ** slop_follows
    flow += slop * heard(slopping, colour(slop_colour))
    flow += splash * heard(fine, walls * colour(splash_colour))
    flow += ring * waver(heard(noise(), colour(ring_colour)), .011 * drift(24.97))
    hiss_gain = walls * colour(HISS_COLOUR) * lifts(pitcher_wall)
    flow += hiss * from_db(1.14 * drift(35)) * heard(tearing + 0.9 * fine, hiss_gain)
    flow += air * from_db(crackle_trim_db) * heard(tearing, walls * colour(crackle_colour))
    spit = heard(fine, colour(crackle_colour) + 0.14 * colour(HISS_COLOUR))
    spit = bursts(SPURTS + spits) * from_db(2.0 * drift(120)) * spit
    return opens(6.622, rise_s=0.0096) * flow + spit


def throb(first_s=6.657, period_s=0.3616, count=7, half_length_s=0.075, level_db=-46.5):
    """A low rumble of coloured noise swells nearly three times a second while the milk is steamed."""
    # (frequency [Hz], relative density [dB per Hz])
    throb_colour = [(42, 0), (60, -12), (90, -11), (125, 3), (165, -6), (220, 4.5), (270, -8.5),
                    (330, -7.5), (420, -11.5), (600, -9.5), (1000, -15), (2500, -47)]
    swells = sum(swell(first_s + k * period_s, half_length_s) for k in range(count))
    valve = opens(SPURTS[0][0], rise_s=0.0046)
    return valve * from_db(level_db) * swells * heard(noise(), colour(throb_colour))


def scene():
    """Purge, dip and frothing, with the small sounds around them."""
    wand = purge() + dribble() + dip() + plops() + frothing() + throb()
    return kitchen() + wand + ticks_and_knocks() + whooshes() + squeaks()


def record(dry, low_cut_hz=37, cutoff_hz=15850):
    """The deepest bass is lost and the top is cut steeply."""
    dry = signal.sosfilt(signal.butter(4, low_cut_hz, "high", fs=SR, output="sos"), dry)
    return signal.sosfilt(signal.ellip(12, .1, 80, cutoff_hz, fs=SR, output="sos"), dry)


dry = scene()
out = record(dry)
output_pcm(out)
```